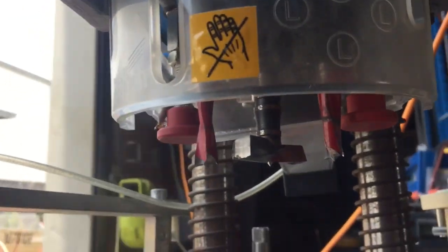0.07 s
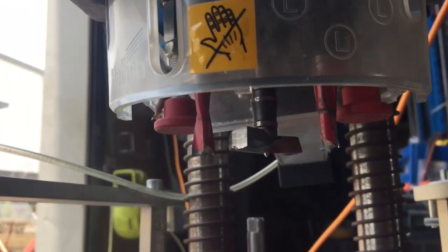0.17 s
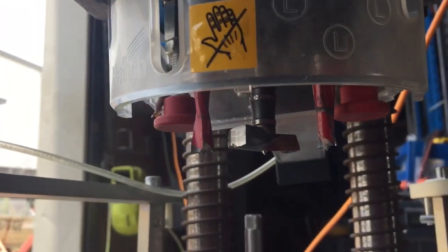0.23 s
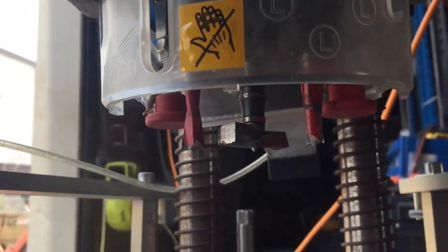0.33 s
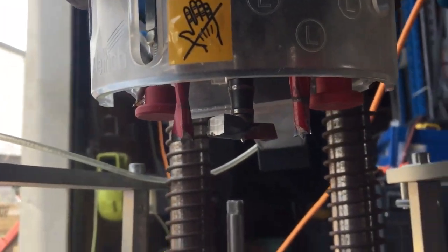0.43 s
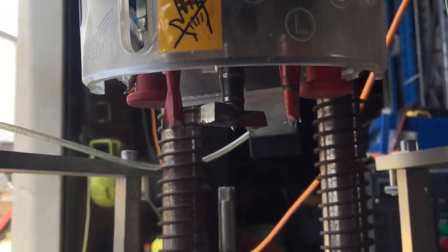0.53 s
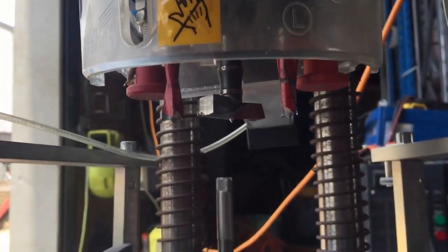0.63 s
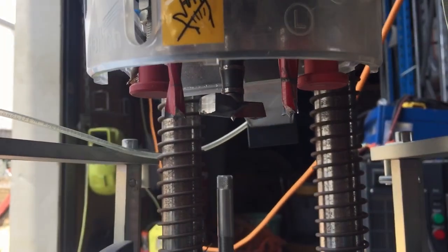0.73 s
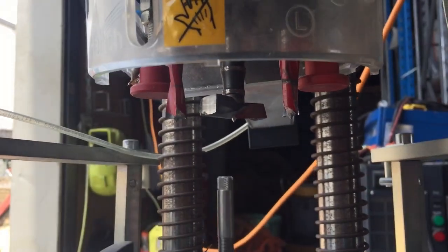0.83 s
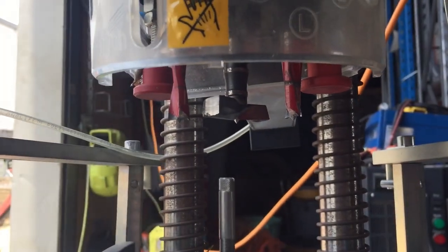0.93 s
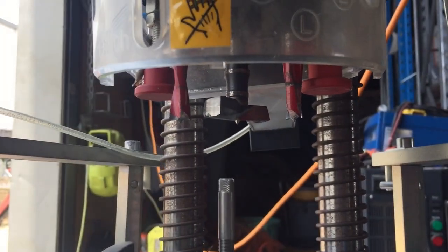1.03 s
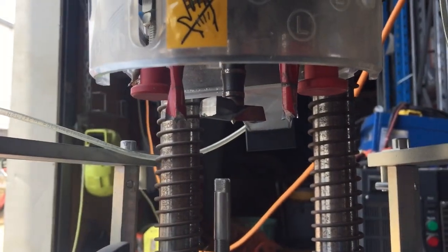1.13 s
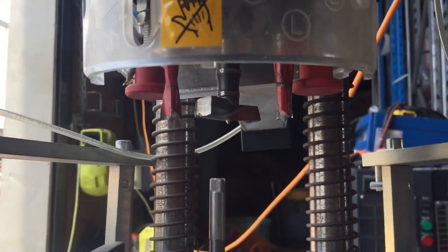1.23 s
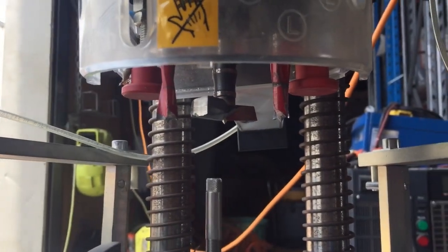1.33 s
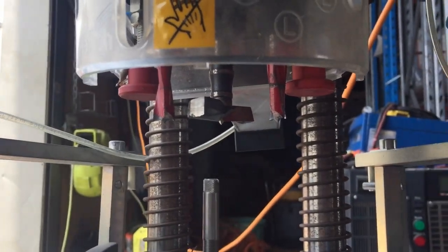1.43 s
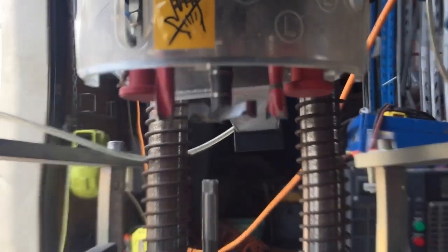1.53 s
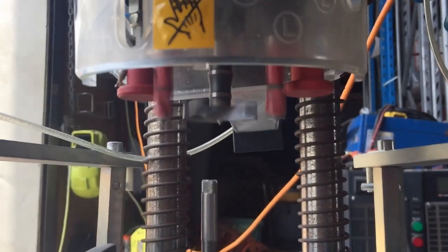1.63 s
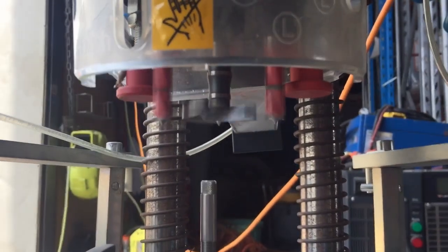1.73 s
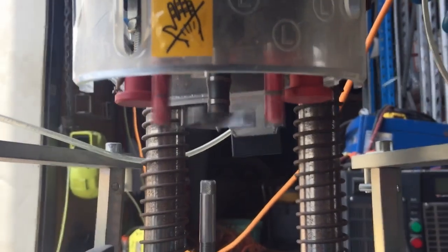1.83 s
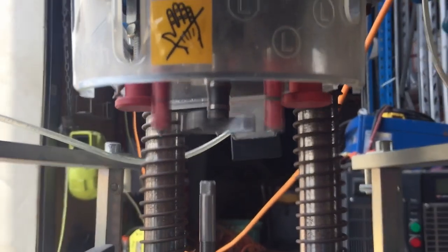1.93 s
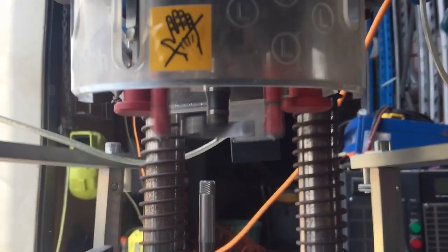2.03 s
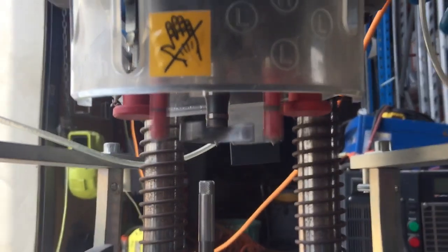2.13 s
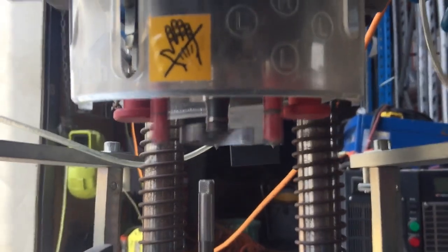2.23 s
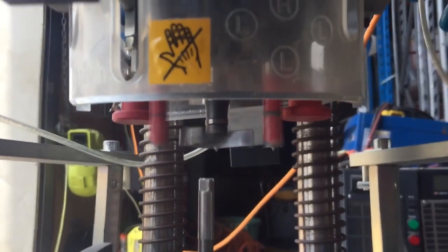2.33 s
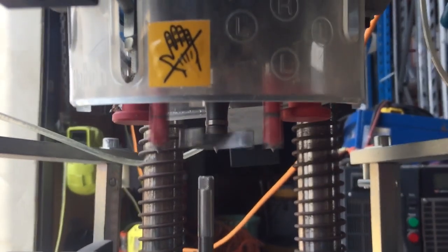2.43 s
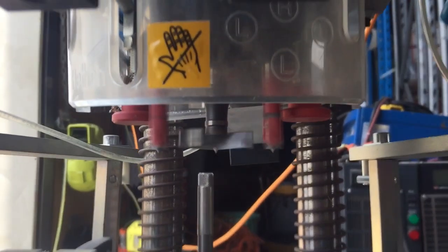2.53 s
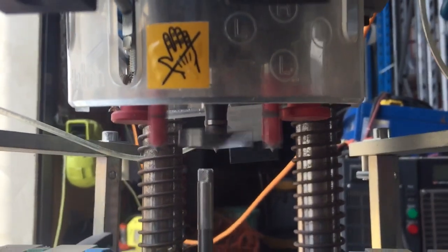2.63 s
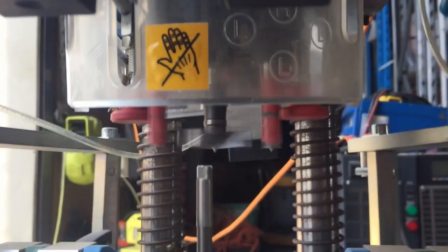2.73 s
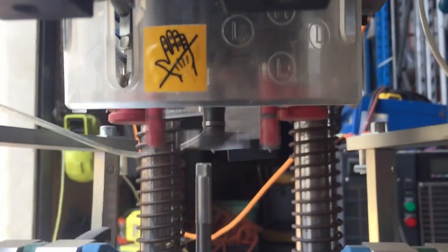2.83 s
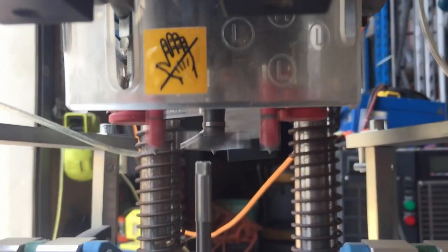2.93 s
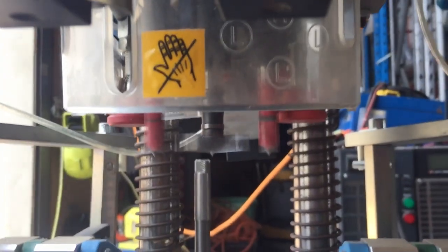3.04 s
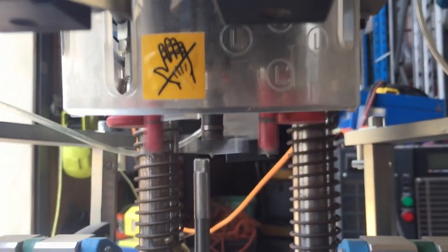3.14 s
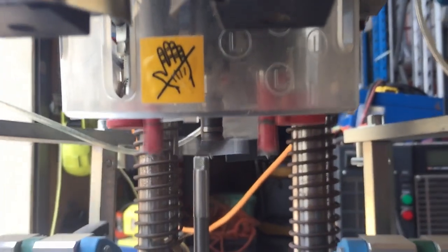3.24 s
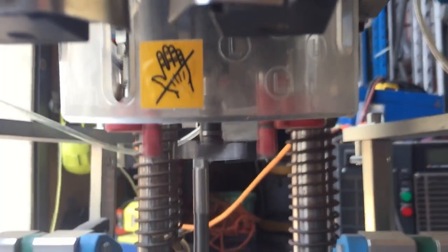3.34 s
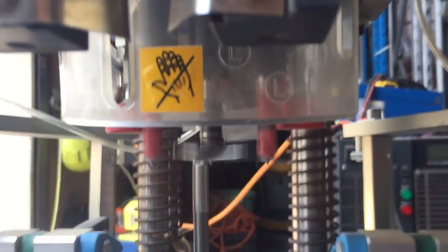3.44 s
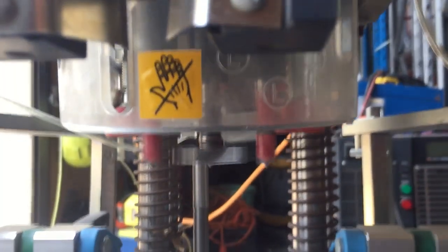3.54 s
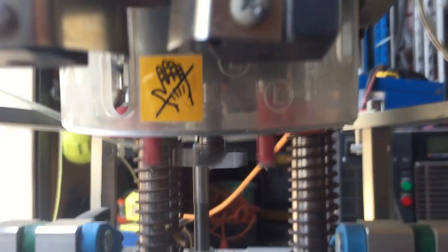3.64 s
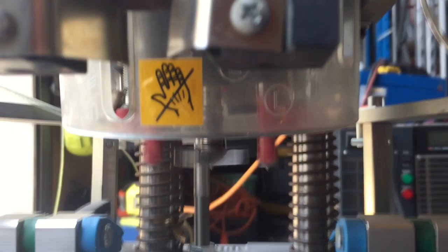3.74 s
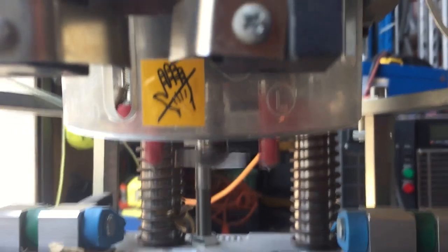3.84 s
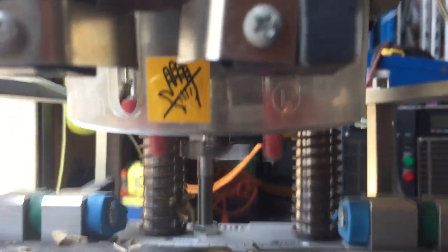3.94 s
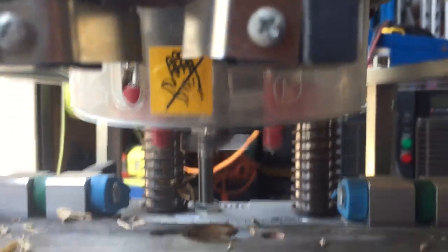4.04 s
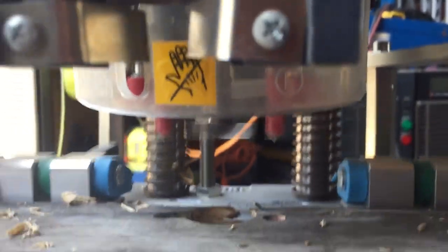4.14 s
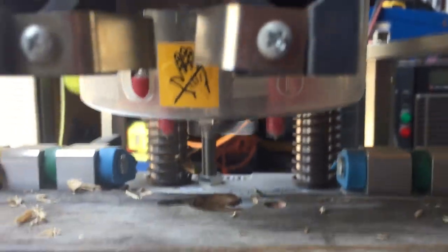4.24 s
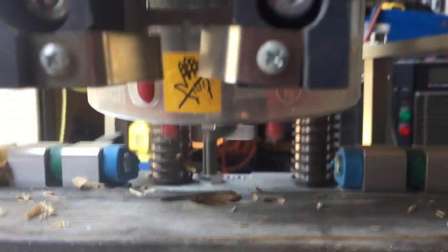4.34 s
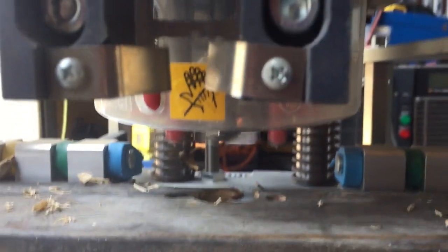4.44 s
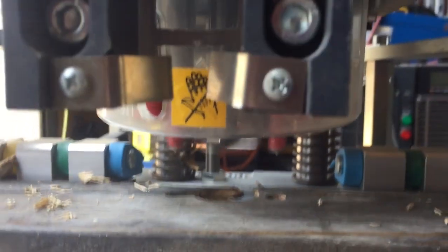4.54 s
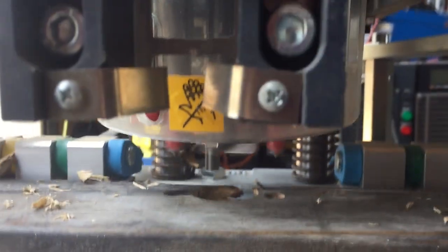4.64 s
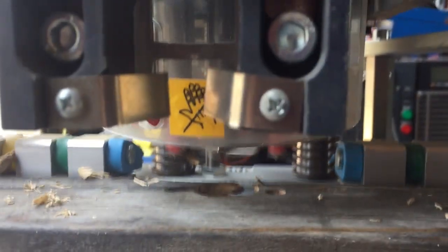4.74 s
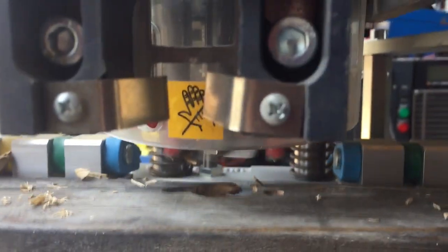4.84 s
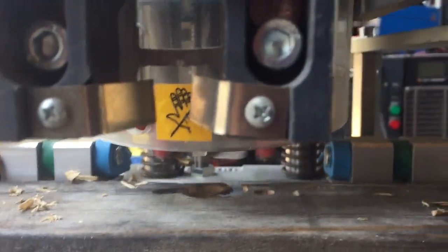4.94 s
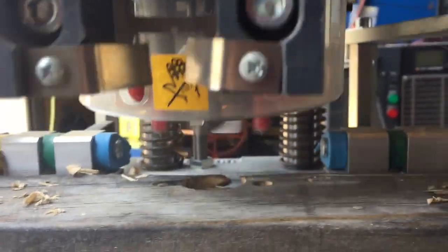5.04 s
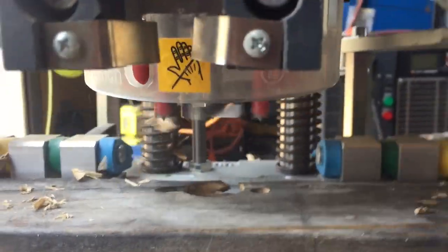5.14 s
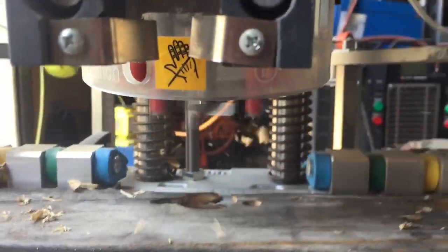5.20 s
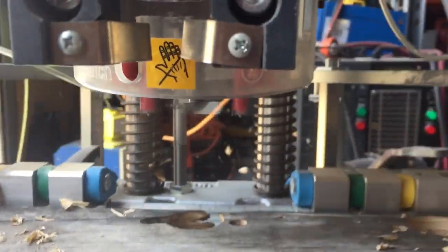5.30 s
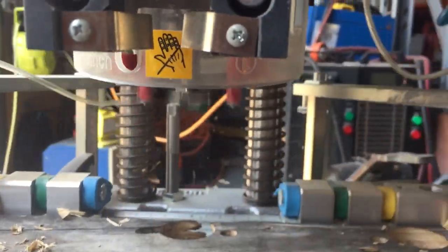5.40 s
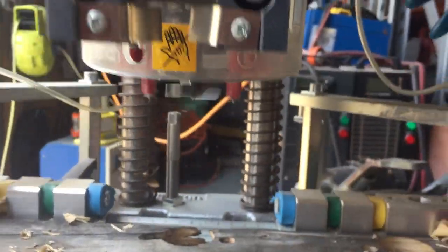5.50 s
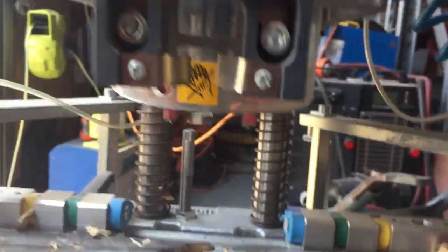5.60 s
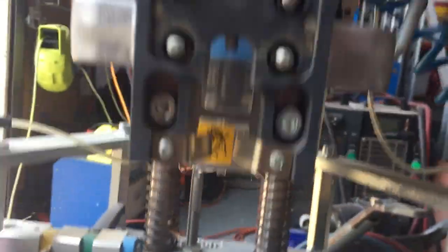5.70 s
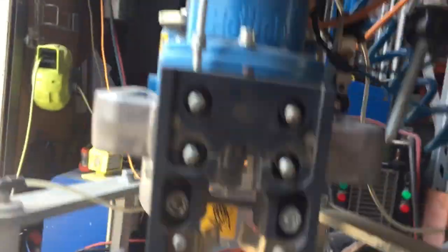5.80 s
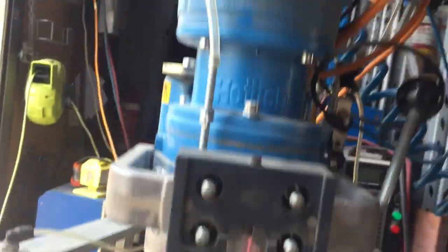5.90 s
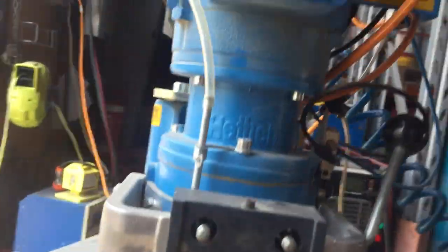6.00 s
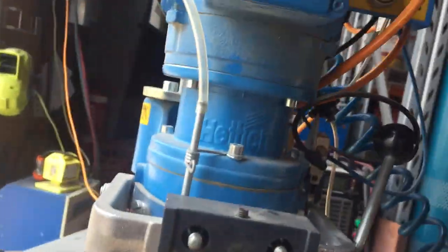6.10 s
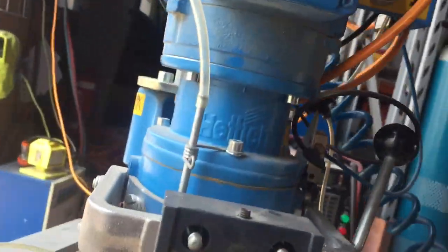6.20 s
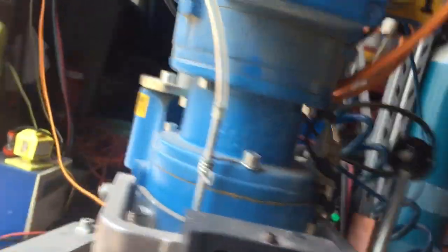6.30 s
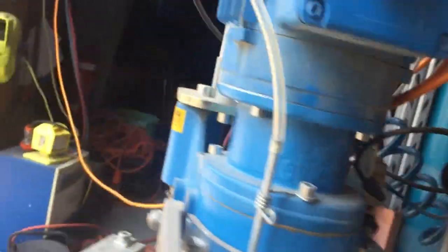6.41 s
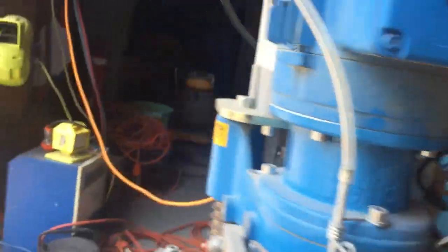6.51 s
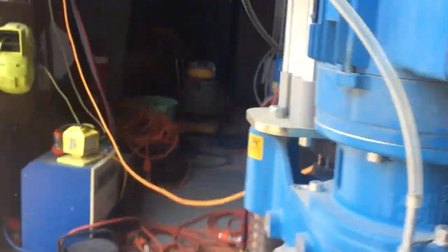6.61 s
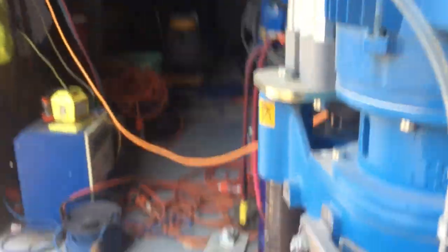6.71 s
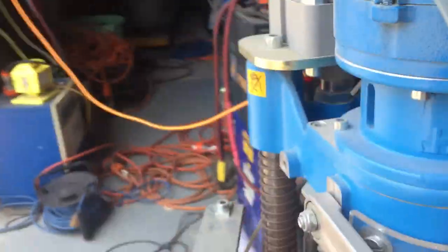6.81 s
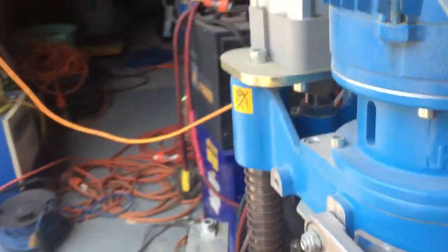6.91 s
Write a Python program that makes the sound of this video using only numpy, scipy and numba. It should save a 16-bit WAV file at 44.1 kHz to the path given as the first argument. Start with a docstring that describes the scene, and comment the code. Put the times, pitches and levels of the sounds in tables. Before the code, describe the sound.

A quiet shop drone, a burst of sharp clacks, a harsh gear whine, then exploding compressed air, a falling brake squeal and small clicks.

```python
"""A geared drilling head in a workshop, heard from a hand's width away.
Filtered noise and wavering tones make the hum of the shop. A contactor clicks, then ringing noise bursts clack,
dull frame tones knock, and rough noise through the gear case rattles up to speed under whining tones.
A noise blast of compressed air overloads the microphone; throbbing noise, a falling squeal and a sinking
low tone brake the spindles. The head knocks on its stop; small clicks and a hissing puff of air follow."""
import sys
import numpy as np
from scipy import signal
from scipy.fft import rfft, irfft
from scipy.io import wavfile
from scipy.ndimage import uniform_filter1d, map_coordinates
from numba import njit

SR = 44100
rng = np.random.default_rng(int(sys.argv[2]) if len(sys.argv) > 2 else 0)


def dump(signal):
    """Clip the signal to [-1, 1] and save it as 16-bit WAV at the path in sys.argv[1]."""
    limited = np.clip(np.atleast_2d(signal).T, -1, 1)
    pcm = np.round(limited * 32767).astype(np.int16)
    wavfile.write(sys.argv[1], SR, pcm)


N = 306932

# Spectrum tables give relative strength: their overall level is evened out before use.
# Shop background, lower while the head runs and lowest soon after: t/s, level/dB
SHOP_LEVEL = [(0, -32.5), (1.55, -34), (1.8, -37), (4.5, -35.5), (5.1, -37), (5.8, -45), (6.3, -35),
              (6.96, -35.5)]
# Spectrum of the shop rumble: f/Hz, level per Hz/dB
SHOP_SPECTRUM = [(15, -58), (38, -41), (55, -10), (100, -11), (170, -6.5), (300, -15.5), (450, -27.5),
                 (700, -27.5), (1300, -25.5), (1500, -32.5), (3000, -34.5), (4500, -44), (6000, -56),
                 (8000, -80), (16000, -91)]
# Wavering shop resonances: f/Hz, width/Hz, level against the background/dB
SHOP_HUM = [(90.1, 2.4, -12.5), (180.7, 3.4, -11), (225, 8.5, -28.5), (429, 6.8, -25), (599.3, 8.4, -25),
            (663, 17, -25)]
# The deep rumble swells as the microphone is moved: t/s, lift/dB, half length/s
SWELLS = [(4.903, 13, .25), (6.7, 7.5, 0.98)]
# Metal clacks and ticks: t/s, peak of the ring/dB, centre f/Hz, width/Hz
CLACKS = [(1.571, -25, 1440, 1300), (1.621, -12, 3320, 2610), (1.639, -13, 2510, 3000),
          (1.6441, -7, 2390, 3000), (1.6625, -15, 1730, 1186), (1.6736, -25, 2240, 2000),
          (1.683, -12, 3300, 2500), (1.6905, -14, 2650, 1500), (1.6985, -8, 2940, 1500),
          (1.704, -13, 3120, 1500), (1.7187, -9.5, 1660, 1200), (1.7312, -12, 2760, 2010),
          (1.739, -19, 1540, 1500), (1.763, -8, 2800, 2300), (1.778, -19, 2480, 2000),
          (1.794, -15, 2800, 2500), (5.843, -40, 2720, 800), (5.881, -32, 2700, 1000),
          (5.923, -30, 2850, 1100), (5.964, -33, 3110, 1100), (6.031, -36, 2940, 1004),
          (6.08, -34.5, 2420, 700), (6.175, -40, 2800, 1100), (6.267, -41, 2700, 1100),
          (6.373, -24.5, 1700, 1900), (6.389, -24, 1510, 1500), (6.393, -27.5, 3600, 3000),
          (6.397, -28, 2500, 1800), (6.401, -30, 3900, 3000), (6.405, -29, 2600, 1800),
          (6.412, -32, 3300, 2200), (6.577, -25.5, 2290, 1200), (6.715, -31, 1500, 1800),
          (6.7545, -23, 2900, 3200), (6.765, -25.5, 2600, 2600), (6.814, -23, 3100, 1900)]
# Whine of the meshing gear teeth: t/s, level/dB
MESH = [(1.78, -36), (1.85, -37), (2.8, -31.5), (3.6, -31), (5.01, -32.5)]
# Tones tied to the shaft: multiple of shaft speed, level against the mesh tone/dB
SHAFT_ORDERS = [(18, -13), (24, -17.5), (29, -22), (34, -13), (35, -12.5), (57, -14.5), (72, -13.5)]
# The bench hums along while the motor runs: multiple of BENCH_HZ, level/dB
BENCH_HUM = [(1, -49.5), (3, -48.5), (4, -44)]
# Spectrum of the gear case: f/Hz, level per Hz/dB
CASE = [(150, -19.5), (250, -22), (303, -8.5), (484, -17.5), (875, -7.5), (1040, -11), (1580, -0.5),
        (1910, -4), (2910, -3), (4260, -9), (4990, -20), (9830, -47), (16000, -56.5)]
# Case resonances, for all of the run, from beside the head, from the table edge: f/Hz, width/Hz, lift/dB
CASE_PEAKS = [(865, 71, 5.5), (1167, 64, 9), (2186, 44, 7), (2975, 610, 7), (9550, 790, 5.5)]
CASE_PEAKS_BESIDE = [(1747, 97, 9.5), (2030, 65, 5), (2630, 72, 4.5), (3498, 95, 9), (4330, 460, 10)]
CASE_PEAKS_EDGE = [(1500, 73, 4.5), (1716, 61, 5.5), (742, 35, 9), (2000, 71, 3), (2506, 120, 7.5),
                   (3350, 73, 6.5), (3715, 150, 8), (4300, 300, 4.5)]
# Start and end of the microphone's move from beside the head to the table edge: t/s
MIC_MOVES_S = (3.78, 4.12)
# Where the rattle is split into bands: f/Hz
RATTLE_SPLIT_HZ = [2416, 3630, 5280, 10000]
# Lift of the band above each split, speeding up, at speed beside the head, at speed from the edge: lift/dB
RUNUP_LIFT_DB = [-4, -6, 11, 12]
BESIDE_LIFT_DB = [-2, -1, 14, 10]
EDGE_LIFT_DB = [-2.5, 1, 13.5, 14]
# Dull knocks through frame and hand: t/s, peak/dB, pitch factor
KNOCKS = [(1.614, -21.5, 1.22), (1.639, -20, 0.91), (1.69, -21.5, 0.333), (1.72, -25, 0.714),
          (1.769, -35, 0.73), (5.01, -7.5, 0.34), (5.083, -10, 1.2), (5.612, -12.5, 0.99),
          (5.635, -22, 0.39), (6.651, -18, 0.18), (6.915, -22, 0.25)]
# Ringing tones of the frame: f/Hz (times pitch factor), level/dB, time to fall by 60 dB/s
FRAME = [(277, -6.5, 0.12), (506, -7, 0.094), (610, 9.5, 0.014), (677, -12, 0.058)]
# Spectrum of the air blast: f/Hz, level per Hz/dB; its resonances: f/Hz, width/Hz, lift/dB
AIR = [(40, -29), (100, 9), (230, -11.5), (500, 0.5), (970, 3.5), (1700, 0), (2800, 4), (4200, 1),
       (5300, -11.5), (6300, -13.5), (9000, -30.5), (16000, -42)]
AIR_PEAKS = [(955, 110, 5.5), (2040, 170, 6.5), (3010, 660, 5), (4270, 180, 8), (5320, 300, 7)]
# Spectrum of the brake drag: f/Hz, level per Hz/dB
DRAG = [(120, -37.5), (200, -22.5), (310, -8), (440, -15.5), (1120, -6), (1650, -6), (2300, -2.5),
        (2900, -4.5), (3760, -10), (5500, -16), (6200, -19), (10000, -32), (16000, -43)]
# Drag resonances, at first and when slower: f/Hz, width/Hz, lift/dB
DRAG_PEAKS = [(2050, 170, 8), (2780, 280, 3.5)]
DRAG_SLOW_PEAKS = [(1110, 170, 6), (2150, 250, 4), (2500, 200, 1.5), (3030, 500, 7), (3620, 300, 3.5),
                   (4250, 450, 11), (5220, 580, 8.5)]
# Brake squeal, which thins out, returns lower and fades: t/s, f/Hz, level against the drag/dB
SQUEAL = [(5.03, 5350, -2), (5.15, 5200, -6), (5.25, 5000, -8), (5.275, 4800, -13), (5.295, 4650, -8),
          (5.375, 4330, -8), (5.41, 4150, -26)]
# Spectrum of the puff: f/Hz, level per Hz/dB; its resonances: f/Hz, width/Hz, lift/dB
PUFF_SPECTRUM = [(240, -43), (430, -7), (977, -7.5), (1330, -8), (2350, -7.5), (3730, -4), (14000, -40)]
PUFF_PEAKS = [(2430, 100, 7.5), (3620, 110, 1)]

T = np.arange(N) / SR
HZ = np.fft.rfftfreq(N, 1 / SR) + 1e-3

# contactor closes; time to reach speed; valve opens and power is cut
START_S, RUNUP_S, VALVE_S = 1.59, 0.14, 5.0102

# shop: lift of the deepest rumble, before the start and after it
DEEP_DB, DEEP_RUNNING_DB = 6, 2
DRONE_HZ, DRONE_DB = 151.3, -4  # level against the background
# a thin far whine swells and fades; level against the background
WHINE_HZ, WHINE_DB, WHINE_SWELL_DB, WHINE_PEAK_S, WHINE_EVERY_S = 4152, -31.5, 3.5, .13, .617

# clacks: ring-out of a clack 1 kHz wide; wider ones die faster by this power
CLACK_RISE_S, CLACK_T60_S, CLACK_DAMPING = 0.00071, 0.042, 0.7
CRACK_DB, CRACK_HZ, CRACK_S = 2, 5500., 0.0017  # bright edge of a full-scale clack, against its ring
CRACK_GROWTH = 1.6  # harder blows are brighter: extra dB of edge per dB of blow

TEETH, MESH_HZ, BENCH_HZ = 32, 1594.2, 75.4
# level of the lowest band at speed; surge as the gears take the load; time to engage
RATTLE_DB, SURGE_DB, SURGE_S, SURGE_WIDTH_S, ENGAGE_S = -27, 7.5, 1.705, 0.039, 0.015
RUNUP_DB, BACKLASH_DB = -4, 3  # rattle before full speed, against the level above; its unevenness
DRIFT = .004  # share by which the case resonances wander as hand and head sway
# the clamps come between head and microphone: change of each upper band per second
SHADE_S, SHADE_DB_S = 4.24, [-1.5, 4, -7.5, -12]
# one tooth ticks once a turn; 3 dB are added to the level later
TICK_HZ, TICK_WIDTH_HZ, TICK_DB, TICK_SPREAD_DB = 6600, 1000, -47, 2.5

BLAST_DB, BLAST_RISE_S, BLAST_HOLD_S, BLAST_SAG_DB = 0, 0.00073, 0.028, -3.5
BLAST_FALL_DB_S, BLAST_LOW_DB = -175, 2  # fall per second; lift of the lows

GRIP_S, LET_GO_S = 5.02, 5.635  # brake closes; drag lets go
RUBS_HZ, SLOWING_HZ_S, CREEP_HZ = 102, 99.6, 38.59  # rubs per second at first, loss per second, least
DRAG_DB, DRAG_SAG_DB, RELEASE_DB_S = -17.5, -4.5, -125  # level, sag until the release, fall per second after it
TAIL_DB, TAIL_DB_S = -43.5, -16  # faint tail; its fall per second
UPPER_DB, UPPER_RISE_DB, UPPER_TAIL_DB = -2, 10.5, -7.5  # drag brightens as it slows, dulls as it lets go
SHIFT_S, SHIFT_LENGTH_S = 5.38, 0.12  # the drag's resonances shift as the spindles slow
THROB_DB, THROB_END_S, THROB_FALL_DB_S = -40, 5.47, -90  # the low tone

PUFF_S, PUFF_RISE_S, PUFF_END_S, PUFF_DB, PUFF_FALL_DB_S = 6.465, 0.038, 6.9, -34.5, -36
PUFF_TREBLE_DB, PUFF_DULLS_DB_S = -2, -40  # treble lift at first; its change per second

ROOM_T60_S, ROOM_DB = 0.33, -14
OVERLOAD, KNEE, TOP_HZ = .66, 4., 15750  # ceiling of the input; sharpness of its bend; treble limit


def undb(db):
    """Turn decibels into a plain factor."""
    return 10 ** (np.asarray(db) / 20)


def unit(x):
    """Scale to an average strength (rms) of 1."""
    return x / np.sqrt(np.mean(x ** 2))


def since(s):
    """Seconds after s, zero before."""
    return np.maximum(T - s, 0)


def ramp(s, length):
    """Rises from 0 to 1 over length seconds from s."""
    return np.clip((T - s) / length, 0, 1)


def read(table):
    """Columns of a curve at every sample, and a gate that is open inside its span."""
    s, *columns = np.transpose(table)
    gate = uniform_filter1d(1. * ((T > s[0]) & (T < s[-1])), size=300)
    return [np.interp(T, s, c) for c in columns] + [gate]


def colour(x, spectrum, peaks=()):
    """Shape by a smooth spectrum with resonances standing on it; rms 1."""
    hz, db = np.transpose(spectrum)
    shape_db = np.interp(np.log(HZ), np.log(hz), db)
    for centre_hz, width_hz, lift_db in peaks:
        shape_db = shape_db + lift_db / (1 + (2 * (HZ - centre_hz) / width_hz) ** 2)
    return unit(irfft(rfft(x) * undb(shape_db), N))


def above(x, hz):
    """The part of x over hz."""
    return irfft(rfft(x) / (1 + (hz / HZ) ** 12), N)


def walk(rate):
    """Random levels held 1 / rate s and smoothed twice; rms 1."""
    k = max(int(SR / rate), 1)
    steps = np.repeat(rng.standard_normal(N // k + 1), k)
    return unit(uniform_filter1d(uniform_filter1d(steps, k), k)[:N])


def grit(rate, spread_db):
    """Dense tiny impacts: noise whose strength wanders, with rate new levels a second."""
    return rng.standard_normal(N) * undb(spread_db * walk(rate))


def sway(x, drift):
    """Play x slightly faster and slower, so that its resonances wander."""
    return map_coordinates(x, [np.arange(N) + np.cumsum(drift)], mode="mirror")


@njit
def svf(x, hz, width):
    """State-variable band-pass with a moving centre, gain 1 there."""
    y, b, l = np.empty(len(x)), 0., 0.
    for i in range(len(x)):
        g, k = np.tan(np.pi * hz[i] / SR), width / hz[i]
        v = (b + g * (x[i] - l)) / (1 + g * (g + k))
        b, l, y[i] = 2 * v - b, l + 2 * g * v, k * v
    return y


def narrow_noise(hz, width):
    """Noise through one steady resonance; rms 1."""
    return unit(svf(rng.standard_normal(N), np.full(N, 1. * hz), 1. * width))


def add(out, s, x):
    """Mix x into out from time s."""
    i = int(s * SR)
    out[i:i + len(x)] += x[:N - i]


def shop():
    """Wide rumble of far machines, a droning motor and wavering resonances."""
    level_db, _ = read(SHOP_LEVEL)
    deep_db = DEEP_DB + (DEEP_RUNNING_DB - DEEP_DB) * ramp(START_S, RUNUP_S)
    for s, db, half in SWELLS:
        deep_db = deep_db + db * np.maximum(1 - np.abs(T - s) / half, 0)
    wide = colour(grit(14, 0.81), SHOP_SPECTRUM)
    deep = wide - above(wide, 100)
    out = undb(-3.0) * (wide + (undb(deep_db) - 1) * deep)
    drone = np.sqrt(2) * np.sin(2 * np.pi * DRONE_HZ * T + .2 * walk(6))
    out += undb(DRONE_DB + 1.3 * walk(7)) * drone
    for hz, width, db in SHOP_HUM:
        out += undb(db + 1.8 * walk(5)) * narrow_noise(hz, width)
    swell_db = WHINE_SWELL_DB * np.cos(2 * np.pi * (T - WHINE_PEAK_S) / WHINE_EVERY_S)
    out += undb(WHINE_DB + swell_db) * narrow_noise(WHINE_HZ, 12)
    return out * undb(level_db)


def clacks():
    """A sharp contact with a rattling tail rings a band around its own centre, steep on both sides."""
    out, t = np.zeros(N), T[:4000]
    noises = rng.standard_normal((len(CLACKS), len(t)))
    for (s, db, hz, width), noise in zip(CLACKS, noises):
        t60 = CLACK_T60_S * (1000 / width) ** CLACK_DAMPING
        ring = noise * np.minimum(t / CLACK_RISE_S, 1) * np.exp(-np.log(1000) * t / t60)
        crack = noise * np.exp(-t / CRACK_S)
        for widen in (1., 1.3, 1.6, 2.):
            ring = svf(ring, np.full(len(t), 1. * hz), max(widen * width, 200.))
            crack = svf(crack, np.full(len(t), CRACK_HZ), 4500.)
        edge = undb(CRACK_DB + CRACK_GROWTH * db) * crack
        add(out, s, undb(db) * (ring / np.max(np.abs(ring)) + edge))
    return out


def gears():
    """Tooth impacts ring the gear case, stronger twice a turn; the mesh and some shaft orders sing."""
    mesh_db, singing = read(MESH)
    running = ramp(START_S, ENGAGE_S) ** 2 * (1 - ramp(VALVE_S, .008))
    moved = np.interp(T, MIC_MOVES_S, (0, 1))
    fast = ramp(START_S + RUNUP_S / 2, RUNUP_S)
    turn = 2 * np.pi * MESH_HZ / TEETH * T  # shaft angle

    level_db = RATTLE_DB + SURGE_DB * np.exp(-((T - SURGE_S) / SURGE_WIDTH_S) ** 2)
    level_db = level_db + (RUNUP_DB + BACKLASH_DB * walk(150)) * (1 - fast)
    impacts = grit(700, 1.18) * (1 + 0.045 * np.cos(2 * turn))
    beside_head = colour(impacts, CASE, CASE_PEAKS + CASE_PEAKS_BESIDE)
    table_edge = colour(impacts, CASE, CASE_PEAKS + CASE_PEAKS_EDGE)
    rattle = sway((1 - moved) * beside_head + moved * table_edge, DRIFT * walk(4))

    # each band is what lies above one split but not above the next
    parts = [rattle] + [above(rattle, hz) for hz in RATTLE_SPLIT_HZ] + [0]
    low = parts[0] - parts[1]
    out = low * undb(0.49 * walk(6.42))
    lifts = zip(RUNUP_LIFT_DB, BESIDE_LIFT_DB, EDGE_LIFT_DB, SHADE_DB_S)
    for k, (slow, beside, edge, shade) in enumerate(lifts):
        lift_db = slow + fast * (beside - slow) + moved * (edge - beside) + shade * since(SHADE_S)
        out += (parts[k + 1] - parts[k + 2]) * undb(lift_db + .3 * walk(6))

    tones = undb(0.62 * walk(9.8)) * np.sin(TEETH * turn + 0.4 * walk(40))
    for order, db in SHAFT_ORDERS:
        tones += undb(db + 5.3 * walk(5.7)) * np.sin(order * turn + 0.66 * walk(15))
    hum = np.zeros(N)
    for k, db in BENCH_HUM:
        hum += undb(db + 0.67 * walk(4.7)) * np.sin(2 * np.pi * k * BENCH_HZ * T + 0.75 * walk(9))

    once_a_turn = np.diff(np.floor(turn / (2 * np.pi)), prepend=0)
    tick = once_a_turn * undb(TICK_SPREAD_DB * rng.standard_normal(N))
    for _ in range(2):
        tick = svf(tick, np.full(N, TICK_HZ), TICK_WIDTH_HZ)
    tick = undb(TICK_DB) * (1 - moved) * unit(tick)
    sung = np.sqrt(2) * (undb(mesh_db) * tones + hum + tick)
    return running * undb(level_db) * out / np.std(low) + singing * sung


def knocks():
    """Frame modes; softer, heavier blows push longer and sound lower."""
    out, t = np.zeros(N), T[:12000]
    for s, db, pitch in KNOCKS:
        ring = np.zeros(len(t))
        for hz, mode_db, t60 in FRAME:
            fade = np.exp(-np.log(1000) * t / t60)
            ring += undb(mode_db) * np.sin(2 * np.pi * pitch * hz * t) * fade
        ring = ring * (1 - np.exp(-t * pitch / .0012))
        add(out, s, undb(db) * ring / np.max(np.abs(ring)))
    return out


def blast():
    """Compressed air bursts from the exhaust port, holds briefly and dies away."""
    level_db = BLAST_DB + BLAST_SAG_DB * ramp(VALVE_S, BLAST_HOLD_S)
    level_db = level_db + BLAST_FALL_DB_S * since(VALVE_S + BLAST_HOLD_S)
    air = colour(grit(300, 1.4), AIR, AIR_PEAKS)
    high = above(air, 1080)
    return ramp(VALVE_S, BLAST_RISE_S) * undb(level_db) * (high + undb(BLAST_LOW_DB) * (air - high))


def brake():
    """The lining grips harder twice a turn: throbbing drag noise, a falling squeal and a sinking low tone."""
    rub_hz = np.maximum(RUBS_HZ - SLOWING_HZ_S * since(GRIP_S), CREEP_HZ)
    phase = np.cumsum(rub_hz) / SR  # rubs so far
    slowed = ramp(GRIP_S, LET_GO_S - GRIP_S)
    release_s = (TAIL_DB - DRAG_DB - DRAG_SAG_DB) / RELEASE_DB_S
    tail_s = LET_GO_S + release_s
    loose = ramp(LET_GO_S, release_s)
    level_db = DRAG_DB + DRAG_SAG_DB * slowed ** 2
    level_db = level_db + RELEASE_DB_S * release_s * loose + TAIL_DB_S * since(tail_s)
    dulled = np.sqrt(loose)
    upper_db = (1 - dulled) * (UPPER_DB + UPPER_RISE_DB * slowed) + dulled * UPPER_TAIL_DB

    grip = 1 + 0.72 * np.sin(np.pi * phase) ** 6 * undb(2.0 * walk(60))
    tail_flutter = undb(ramp(tail_s, .05) * walk(60))
    lining = grit(600, 0.77) * grip * tail_flutter
    late = ramp(SHIFT_S, SHIFT_LENGTH_S)
    drag = (1 - late) * colour(lining, DRAG, DRAG_PEAKS) + late * colour(lining, DRAG, DRAG_SLOW_PEAKS)
    drag = sway(drag, 3 * DRIFT * walk(12))
    high = above(drag, 3500)
    low = drag - high

    squeal_hz, squeal_db, _ = read(SQUEAL)
    squeal = svf(grip * grit(70, 1.5), squeal_hz * (1 + .015 * walk(40)), 380.)
    squeal = unit(svf(squeal, squeal_hz, 600.))
    rub = (low + undb(upper_db) * high) / np.std(low) + undb(squeal_db) * squeal
    tone_db = THROB_DB + THROB_FALL_DB_S * since(THROB_END_S)
    tone = np.sqrt(2) * undb(tone_db) * np.sin(2 * np.pi * phase)
    return ramp(GRIP_S, 0.0076) * (undb(level_db) * rub + tone)


def puff():
    """Spluttering hiss of air through two resonances, duller as it fades."""
    gate = ramp(PUFF_S, PUFF_RISE_S) * (1 - ramp(PUFF_END_S, 0.079))
    level_db = PUFF_DB + PUFF_FALL_DB_S * since(PUFF_S + PUFF_RISE_S)
    treble_db = PUFF_TREBLE_DB + PUFF_DULLS_DB_S * since(PUFF_S)
    hiss = colour(grit(250, 1.1), PUFF_SPECTRUM, PUFF_PEAKS)
    return gate * undb(level_db) * (hiss + (undb(treble_db) - 1) * above(hiss, 6200))


def room(x):
    """Add the room's echo as a fading noise tail, duller than the direct sound."""
    t = T[:int(ROOM_T60_S * SR)]
    fade = np.exp(-np.log(1000) * t / ROOM_T60_S) * np.minimum(t / 0.012, 1)
    tail = signal.lfilter([1], [1, -.5], rng.standard_normal(len(t)) * fade)
    tail = tail / np.sqrt(np.sum(tail ** 2))
    return x + undb(ROOM_DB) * signal.fftconvolve(x, tail)[:N]


def scene():
    """Clacks, knocks, blast and puff echo in the room; shop, gears and brake join without added echo."""
    echoing = room(clacks() + knocks() + blast() + puff())
    return (shop() + gears() + brake() + echoing)[None]


def record(dry):
    """The microphone input flattens the blast; the top is cut."""
    flat = dry / (1 + np.abs(dry / OVERLOAD) ** KNEE) ** (1 / KNEE)
    return signal.sosfilt(signal.ellip(10, .2, 80, TOP_HZ, fs=SR, output="sos"), flat)


dry = scene()
out = record(dry)
dump(out)
```